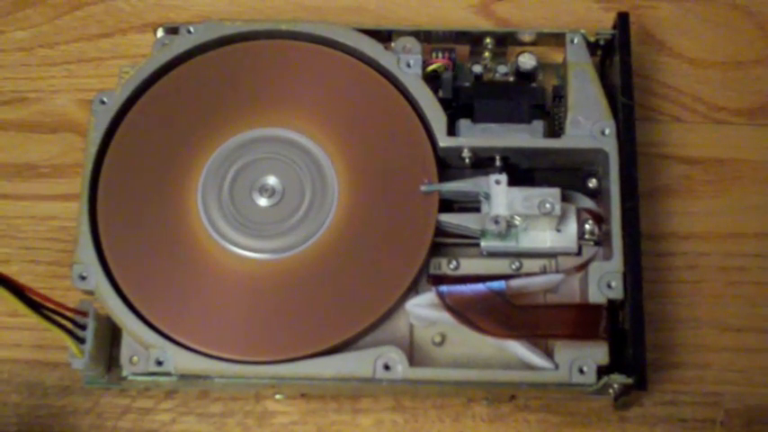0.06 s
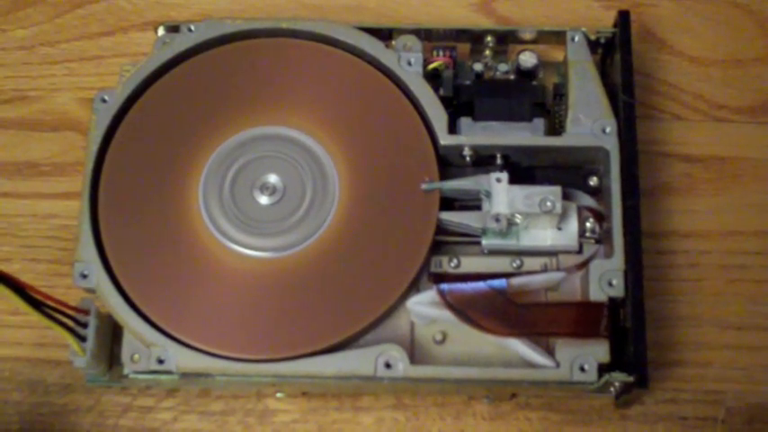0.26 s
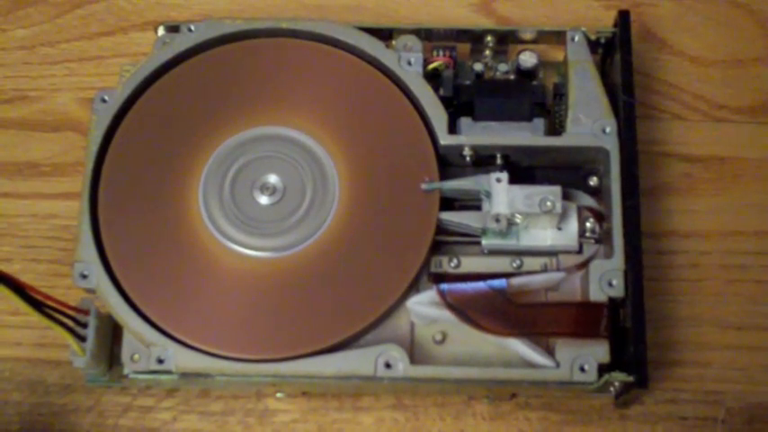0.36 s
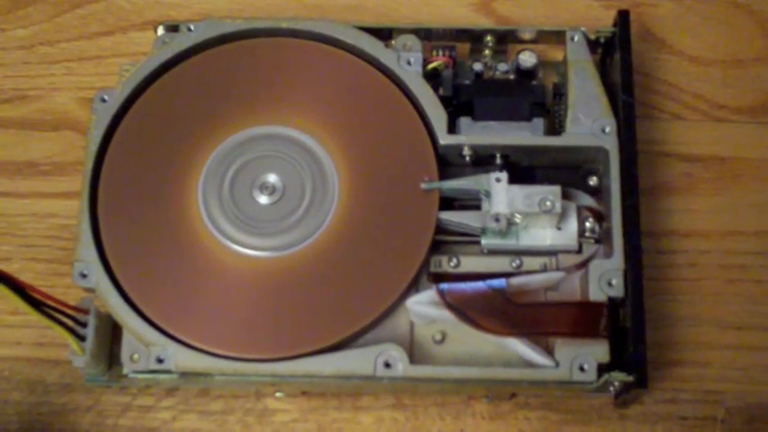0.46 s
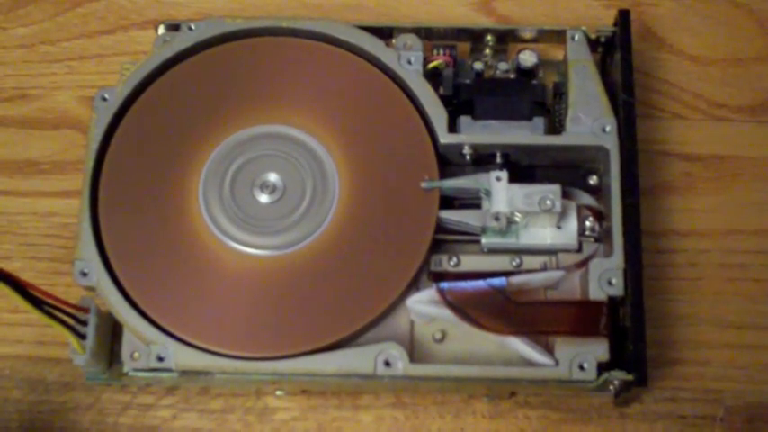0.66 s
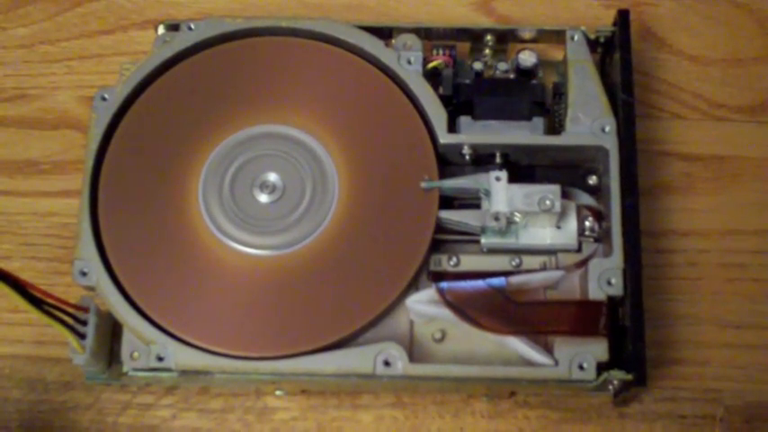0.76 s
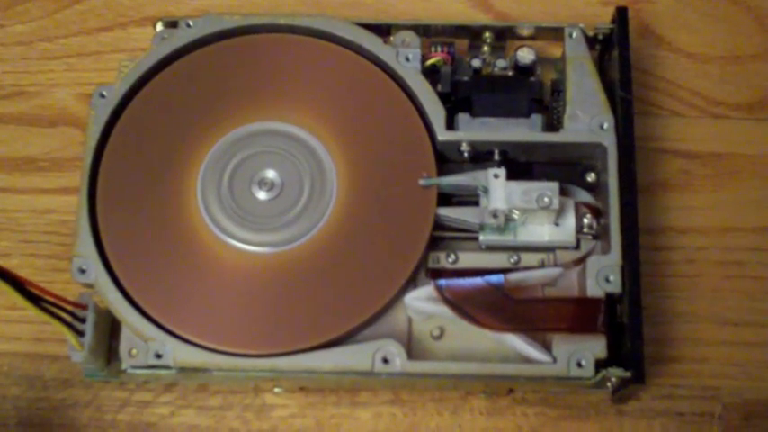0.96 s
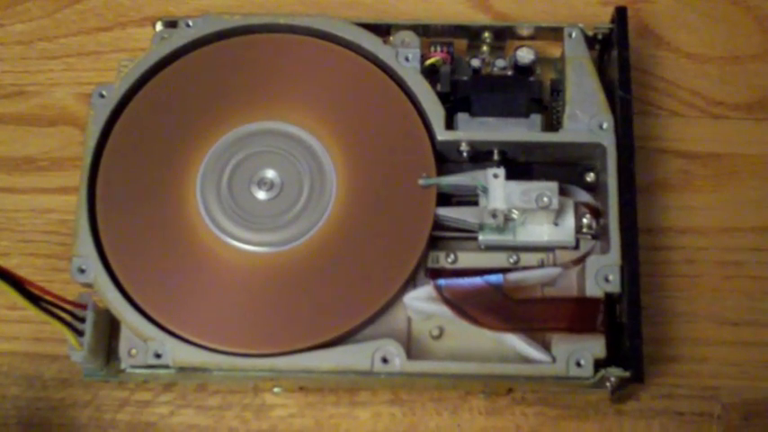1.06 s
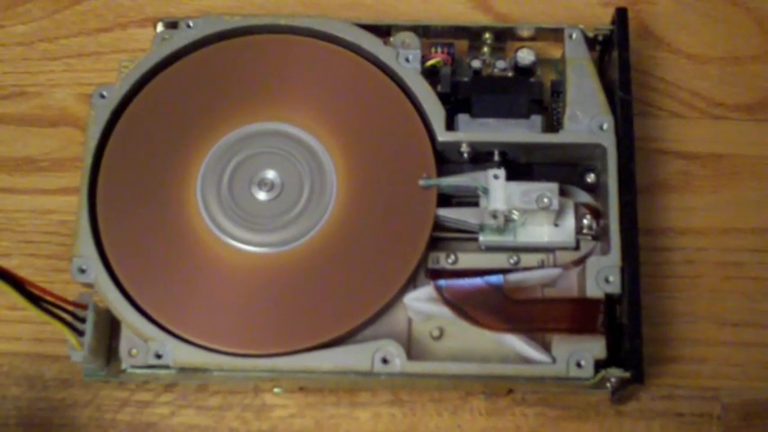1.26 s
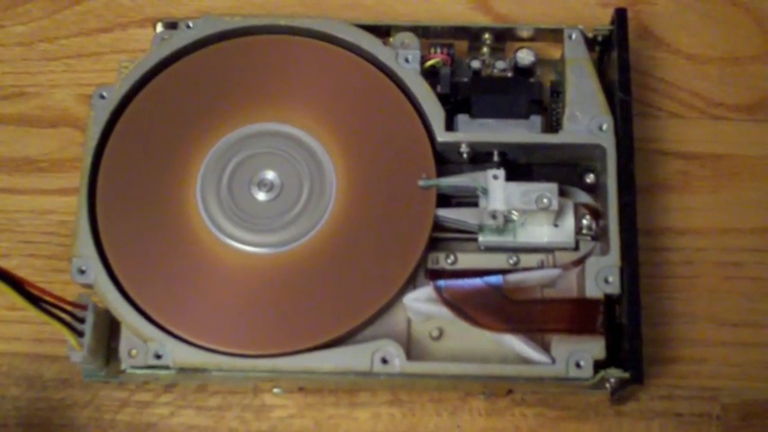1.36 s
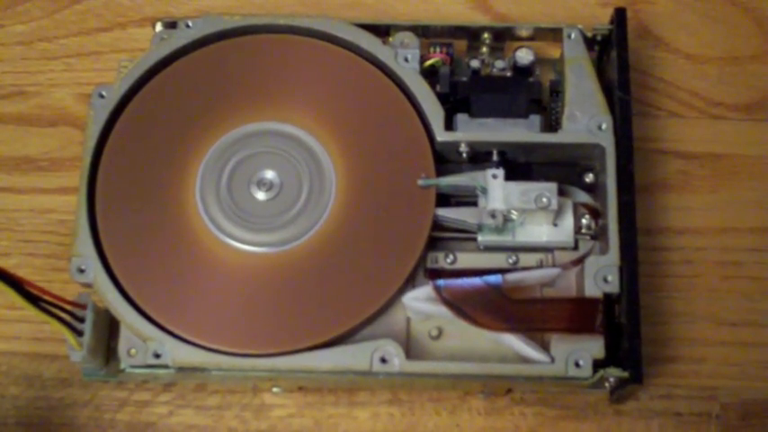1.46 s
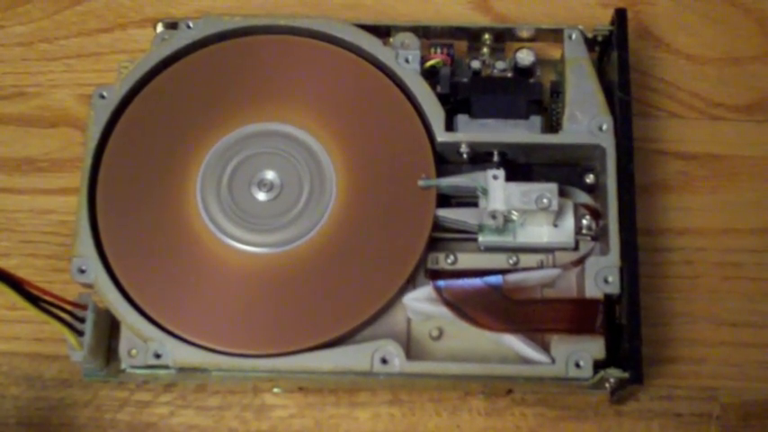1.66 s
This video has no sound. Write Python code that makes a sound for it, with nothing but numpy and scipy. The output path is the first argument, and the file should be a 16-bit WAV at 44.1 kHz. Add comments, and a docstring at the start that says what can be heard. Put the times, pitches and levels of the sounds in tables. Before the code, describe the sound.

Close to the microphone indoors, a hard drive whirs steadily with singing bearings and a thin whine. A single sharp click ends the whine, then the disks keep spinning as their pitch slowly starts to fall.

```python
"""Singing ball bearings, hissing platters and a motor's whine: an open old hard drive spins on
a wooden desk, close in front of the microphone. One sharp click, likely the power being cut,
bounces off the desk and a wall and ends the whine. The spindle starts to coast slowly down,
and the bearing tones sink with it. Underneath, air on the microphone makes a low rumble."""
import sys
import numpy as np
from scipy import signal
from scipy.fft import rfft, irfft
from scipy.io import wavfile

SR = 44100
rng = np.random.default_rng(int(sys.argv[2]) if len(sys.argv) > 2 else 0)


def to_wav(sig):
    """Store sig (one row per channel, or 1-D mono) as 16-bit WAV at the path in sys.argv[1].

    Samples outside -1..1 are clipped; the rate is SR.
    """
    pcm = np.clip(np.atleast_2d(sig), -1, 1) * 32767
    pcm = np.round(pcm).astype(np.int16)
    wavfile.write(sys.argv[1], SR, pcm.T)  # frames by channels


N = 74970
T = np.arange(N) / SR
FREQS = np.fft.rfftfreq(N, 1 / SR)
SPINDLE_HZ, CLICK_S = 60.1, .5756  # turns a second at full speed; moment of the click


def bearings(speed, trim_db=.3):
    """Bearing tones sink with the speed, swelling or fading as they cross the frame's resonances."""
    # Each row: pitch at full speed in Hz, level at full speed and when slowed in dB before the trim.
    bearing_tones = [(205, -69, -78), (240.4, -67, -76), (265, -64, -71), (962, -68, -70), (1134, -59, -76),
                     (1202, -54, -76), (1238.5, -47.5, -50), (1265.5, -49, -54), (1286, -64, -55),
                     (1442.5, -52, -48), (1472, -52, -63), (1592, -51, -55), (1660, -59, -70),
                     (1681.5, -42.5, -48), (1706, -53, -53), (1868, -56, -68), (2080, -52, -55),
                     (2104, -52, -57), (2122, -56, -66), (2164, -52, -74), (2293, -59, -50),
                     (2889, -67, -56), (2946, -55, -58), (3366, -60, -70), (5238, -62, -59),
                     (5769, -59, -56), (6105, -65, -58), (6298, -61, -63), (7074, -64, -60)]
    slowed = (1 - speed) / (1 - speed[-1])
    travel = np.cumsum(speed) / SR
    return sum(amp(trim_db + full_db + (slow_db - full_db) * slowed) * tone(hz * travel, waver=.18)
               for hz, full_db, slow_db in bearing_tones)


def platters(speed, turns, level_db=-37.5, fade_db=1, laps_per_turn=.379):
    """Rushing air, a rub on each turn and the bearing balls' slower lap, all coloured by the frame."""
    # Each row: frequency in Hz, share of the power that repeats with each turn.
    rub_shares = [(400, .1), (2000, .08), (5000, .2), (8000, .35), (11500, .55), (15000, .5)]
    # Each row: frequency in Hz, share of the power that repeats with each lap of the balls.
    lap_shares = [(400, .15), (1500, .3), (3000, .25), (6000, .5), (8500, .15), (15000, .1)]
    # The whirr of platters and frame. Each row: frequency in Hz, relative spectral level in dB.
    whirr_spectrum = [(200, -54), (350, -29), (470, -24.5), (560, -19.5), (800, -16.5), (1060, -17.5),
                      (1200, -8.5), (1400, -7), (1650, -8), (1830, -11.5), (2100, -7), (2500, -7.5),
                      (2900, -9), (3300, -14), (3700, -19), (4250, -18), (4800, -11.5), (5300, -17),
                      (6100, -17.5), (6550, -19), (7100, -15.5), (7700, -19.5), (8900, -23), (9800, -20.5),
                      (10600, -23), (11400, -24), (12300, -21.5), (13200, -29), (15000, -35)]
    # Narrow resonances of frame and head arms. Each row: centre in Hz, width in Hz, lift in dB.
    resonances = [(1383, 35, 3.5), (5540, 85, 5), (5900, 83, 7), (7350, 78, 8.5), (9600, 85, 2.5),
                  (11060, 100, 5.5), (11730, 140, 11.5), (13620, 120, 7)]
    rub_share, lap_share = curve(rub_shares), curve(lap_shares)
    air = colour(rng.standard_normal(N), np.sqrt(np.clip(1 - rub_share - lap_share, 0, 1)))
    rub = colour(rough_surface(turns), np.sqrt(rub_share))
    balls = colour(rough_surface(turns * laps_per_turn, SPINDLE_HZ * laps_per_turn), np.sqrt(lap_share))
    peaks_db = sum(db / (1 + (2 * (FREQS - hz) / width) ** 2) for hz, width, db in resonances)
    whirr = unit(colour(air + rub + balls, amp(curve(whirr_spectrum) + peaks_db)))
    slowed = (1 - speed) / (1 - speed[-1])
    return amp(level_db - fade_db * slowed) * whirr


def motor(turns, buzz_db=-50, grit=2.2, decay_s=.02):
    """The motor's whine, locked to the spindle, and a gritty buzz both die away at the click."""
    # Each row: harmonic number of the spindle's rate, level in dB.
    harmonics = [(60, -50), (61, -64), (63, -62), (68, -58), (72, -59), (76, -56), (80, -60), (92, -56),
                 (99, -61), (100, -61), (117, -62), (121, -60), (122, -56), (123, -56), (124, -55),
                 (127, -64), (152, -65), (158, -64), (181, -66), (184, -64), (186, -64), (193, -61),
                 (195, -60)]
    # Each row: frequency in Hz, relative spectral level of the buzz in dB.
    buzz_spectrum = [(2500, -25), (3700, 9), (4600, -1.5), (6200, -5), (7400, 4.5), (8200, -10),
                     (11500, -5), (15000, -25)]
    whine = sum(amp(db) * tone(k * turns, waver=.09) for k, db in harmonics)
    roughness = rough_surface(turns) + grit * rng.standard_normal(N)
    buzz = amp(buzz_db) * unit(colour(roughness, amp(curve(buzz_spectrum))))
    return (whine + buzz) * np.exp(-np.maximum(T - CLICK_S, 0) / decay_s)


def click(gain_db=-2.5, rise_s=.0001, hold_s=.00055, t60_s=.0052):
    """Contacts chatter for an instant, evenly at all pitches, and ring the switch's damped body."""
    # The body of the switch. Each row: frequency in Hz, relative response in dB.
    switch_body = [(100, -29), (600, -22), (950, -40), (1400, -22), (2100, -19.5), (2700, -4.5),
                   (3100, -20.5), (3800, -18), (4300, -8.5), (4950, -15), (5400, -0.5), (5950, -1),
                   (6450, -15), (7100, -6), (7800, -16), (8500, -11.5), (9100, -2), (9900, -1), (10300, -8),
                   (10900, -2), (11800, 0), (12900, 0), (13500, -3), (14150, -12), (14700, -1),
                   (15400, -9.5)]
    age = np.maximum(T - CLICK_S, 0)
    force = np.minimum(age / rise_s, 1) * np.exp(-np.log(1000) * np.maximum(age - hold_s, 0) / t60_s)
    chatter = rng.standard_normal(N)
    for _ in range(3):  # gather the noise into a burst, then flatten its spectrum
        phase = np.angle(rfft(force * np.sign(chatter)))
        chatter = irfft(np.exp(1j * phase), N)
    body_db = curve(switch_body)
    ring = causal_filter(chatter * (age > 0), body_db) / np.sqrt(np.mean(amp(body_db) ** 2))
    return amp(gain_db) * np.linalg.norm(force) * ring


def room(direct, gap_s=.0023, echo_s=.0195, echo_db=-28):
    """Adds quick reflections from the desk, one echo from a wall and a short, faint room tail."""
    age = np.maximum(T - gap_s, 0)
    response = np.zeros(N)
    for db, t60_s in ((-16, .045), (-14.5, .2)):  # desk, then room
        taps = rng.standard_normal(N) * (age > 0) * np.exp(-np.log(1000) * age / t60_s)
        response += amp(db) * taps / np.linalg.norm(taps)
    response[round(echo_s * SR)] += amp(echo_db)
    return direct + signal.fftconvolve(direct, response)[:N]


def rumble(turns, draught_db=-45, hum_db=-55):
    """A low draught on the microphone, nearly alike left and right, and the spindle's imbalance hum."""
    # Air on the microphone. Each row: frequency in Hz, relative spectral level in dB.
    draught_spectrum = [(8, -2.5), (17, 5), (30, -3.5), (48, 1.5), (70, -8), (100, -15), (140, -19),
                        (200, -22.5), (270, -20.5), (420, -28.5), (600, -32), (900, -38), (1500, -54.5)]
    # Each row: frequency in Hz, share of the power common to left and right.
    likeness = [(20, 0.95), (70, 0.78), (200, 1), (400, 1), (900, 1)]
    share = curve(likeness)
    centre = colour(rng.standard_normal(N), np.sqrt(share))
    sides = colour(rng.standard_normal((2, N)), np.sqrt(1 - share))
    draught = unit(colour(centre + sides, amp(curve(draught_spectrum))))
    return amp(draught_db) * draught + amp(hum_db) * tone(turns, waver=.21)


def spindle_speed(drag_per_s=.046, ease_per_s2=.002):
    """Share of full speed: steady until the click, then falling under a drag that slowly eases."""
    coast_s = np.maximum(T - CLICK_S, 0)
    return 1 - drag_per_s * coast_s + ease_per_s2 * coast_s ** 2


def tone(cycles, waver, waver_hz=9.3):
    """A sine of rms 1 whose level and phase wander at random, to a depth set by waver."""
    carrier = np.exp(2j * np.pi * (cycles + rng.random()))
    slow = colour(rng.standard_normal((2, N)), 1 / (1 + (FREQS / waver_hz) ** 4))
    drift = unit(slow[0] + 1j * slow[1])
    return unit((carrier * (1 + waver * drift)).real)


def rough_surface(turns, hz=SPINDLE_HZ):
    """A rough surface that passes once with every turn, hz times a second at full speed."""
    surface = rng.standard_normal(round(SR / hz))
    fine = signal.resample(surface, 8 * len(surface))
    return unit(np.interp(turns % 1, np.arange(len(fine)) / len(fine), fine))


def amp(db):
    """Decibels to gain."""
    return 10 ** (np.asarray(db) / 20)


def unit(x):
    """Scales to rms 1."""
    return x / np.sqrt(np.mean(abs(x) ** 2) + 1e-20)


def curve(points):
    """Interpolates rows of frequency in Hz and value to every bin, over log frequency."""
    hz, value = np.transpose(points)
    return np.interp(np.log(FREQS + 1), np.log(hz + 1), value)


def colour(x, gain):
    """Filters by a gain for each bin."""
    return irfft(rfft(x) * gain, N)


def causal_filter(x, db):
    """Filters by a level for each bin, at minimum phase so that ringing follows its cause."""
    log_gain = np.log(amp(np.concatenate([db, db[-2:0:-1]])))
    response = np.exp(np.conj(signal.hilbert(log_gain)))
    return colour(x, response[:len(FREQS)])


def scene():
    """The drive close up and straight ahead of the microphone, over a low rumble."""
    speed = spindle_speed()
    turns = SPINDLE_HZ * np.cumsum(speed) / SR
    return bearings(speed) + platters(speed, turns) + motor(turns) + room(click()) + rumble(turns)


def record(dry):
    """The microphone input has a steady offset and the click just overloads it; a low-pass follows."""
    offset = .096 * np.array([[1], [-1]])  # share of full scale, opposite left and right
    clipped = np.clip(dry + offset, -1, 1) - offset
    lowpass = signal.firwin(511, cutoff=15400, window=("kaiser", 9), fs=SR)
    return offset + signal.oaconvolve(clipped, lowpass[None], "same")


dry = scene()
out = record(dry)
to_wav(out)
```